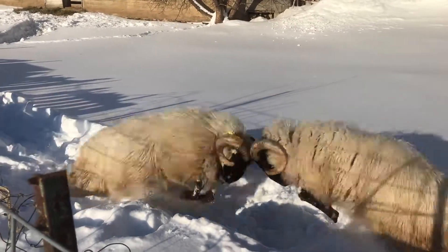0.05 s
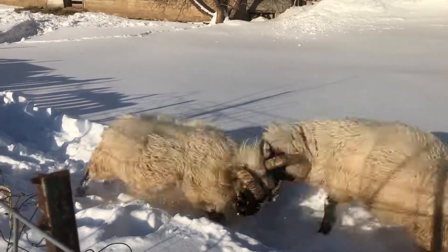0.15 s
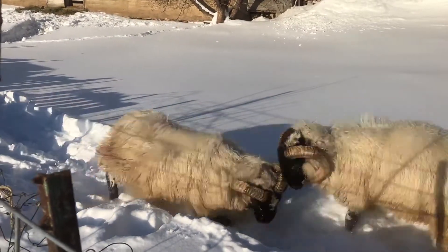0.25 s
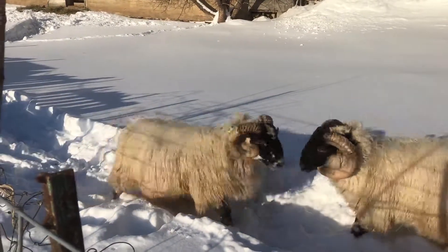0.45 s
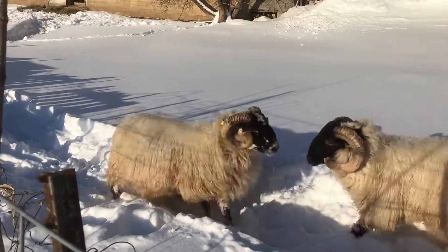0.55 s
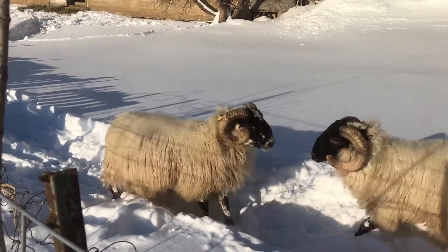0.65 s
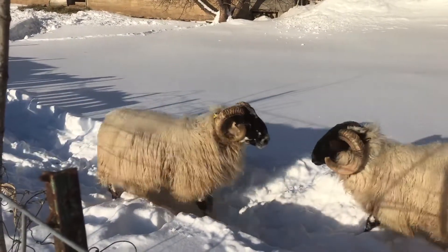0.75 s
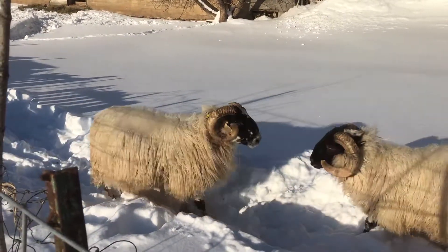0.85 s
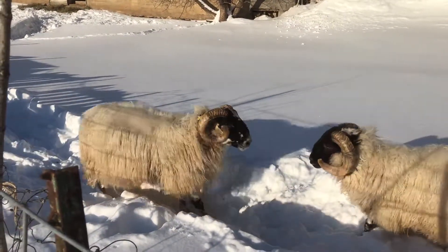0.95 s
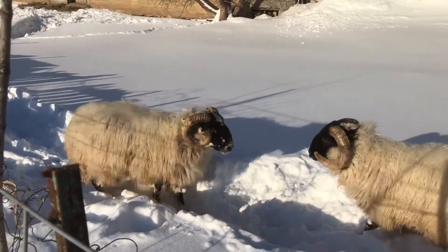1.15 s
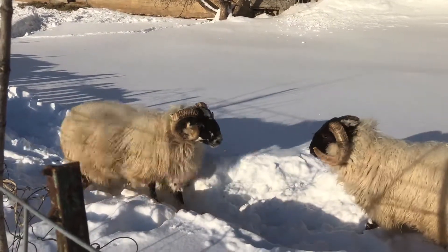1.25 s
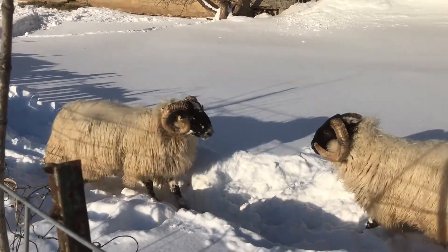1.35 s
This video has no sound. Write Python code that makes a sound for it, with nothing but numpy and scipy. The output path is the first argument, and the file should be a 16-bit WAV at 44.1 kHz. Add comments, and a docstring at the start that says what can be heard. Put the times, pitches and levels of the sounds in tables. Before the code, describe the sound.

Two rams butt heads once at about 0.2 seconds, just after a faint scuff of hooves in snow. The horns crack sharply, with a hard knock and a low, shuddering thud, and a short yard echo fades within half a second. From 0.3 to about 1.3 seconds, much quieter hooves pack, crunch and creak in the snow, with tiny crisp snaps and ticks over faint outdoor air.

```python
"""A hoof scuffs softly through snow, then two rams butt heads once in a farm yard. The horns crack, the skulls
knock and the bodies thud as the blow spreads through them. Fence and sheds throw it back, the low end returning
a little later. The rams back off, hooves packing and creaking in the snow, with snapping crusts and ticking
crumbs over faint outdoor air."""
import sys
import numpy as np
from scipy import signal
from scipy.fft import rfft, irfft, next_fast_len
from scipy.io import wavfile
from scipy.ndimage import uniform_filter1d

SR = 44100
rng = np.random.default_rng(int(sys.argv[2]) if len(sys.argv) > 2 else 0)


def int16_out(signal):
    """Quantize to a 16-bit WAV file."""
    q = np.round(np.clip(np.atleast_2d(signal).T, -1, 1) * 32767)
    wavfile.write(sys.argv[1], SR, q.astype(np.int16))


N = 61739

BUTT_S, BUTT_GAIN_DB = 0.2201, 1.5
LAG_CYCLES = 1.6  # each frequency arrives this many of its own cycles late
# The ring of horns, skulls and bodies: pitch_hz, width_hz, relative_db
RAM_MODES = [(69.5, 31, 32), (158, 85, 24), (276, 80, 21), (395, 70, 21.5), (450, 63, 26.5),
             (534.6, 42, 23.5), (697.5, 160, 25), (889, 94, 23), (1112, 166, 21.5), (1330, 395, 18),
             (2162, 466, 17.5), (2876, 360, 7), (3570, 1100, 6), (7200, 2680, 8)]
def blow():
    """Spectrum of the hit spreading from horn to body: crack first, knock and deep thud behind it."""
    gain = np.sqrt(sum((amp(db) * bump(hz, width)) ** 2 for hz, width, db in RAM_MODES))
    phase_cycles = LAG_CYCLES * np.log(bins() / 1000) + 0.73
    return amp(BUTT_GAIN_DB) * causal(gain) * np.exp(-2j * np.pi * phase_cycles)


SOFTEN_ABOVE_HZ = 11400
# Ticks of ridged horn slipping and catching: start_s, level_db, pitch_hz
HORN_CATCHES = [(0.2209, -11.5, 2612), (0.2228, -4.5, 6000)]
def horns(hit):
    """The hit and the catches right after it; horn yields a little, which softens the crack."""
    give = 1 / np.sqrt(1 + (bins() / SOFTEN_ABOVE_HZ) ** 4)
    ticks = sum(play(amp(db) * causal(give * bump(hz, hz)), s) for s, db, hz in HORN_CATCHES)
    return play(hit * give, BUTT_S) + ticks


# Low echoes of the hit off the yard: delay_s, level_db
LOW_ECHOES = [(.047, -14.5), (0.084, -26)]
def low_echoes(thud):
    """The yard throws back the low part of the hit, later and fainter."""
    return sum(amp(db) * play(thud, BUTT_S + delay) for delay, db in LOW_ECHOES)


# Slapback off fence and sheds: start_s, level_db, cutoff_hz, smear_s
SLAPBACKS = [(0.2465, -24.5, 1500, 0.0038), (0.2542, -22, 6100, 0.00061), (0.2664, -27, 3000, 0.0013),
             (0.297, -28, 2500, 0.015)]
def echoes(hit, highs):
    """The upper part of the hit bounces back, dulled and smeared."""
    out = np.zeros(N)
    for s, db, cutoff_hz, smear_s in SLAPBACKS:
        scatter = rng.choice([-1., 1.], N) * np.exp(-since(0) / smear_s)
        colour = causal(highs / np.sqrt(1 + (bins() / cutoff_hz) ** 2))
        out += amp(db) * play(hit * colour * spectrum_of(scatter / np.linalg.norm(scatter)), s)
    return out


GROUND_DB, GROUND_T60_S = -23.5, 0.081
# Tone of the splash off the ground: frequency_hz, relative_db
GROUND_EQ = [(60, -4.5), (200, -0.5), (500, 6), (1000, -3.5), (2000, -5.5), (4000, -19.5), (7500, -25),
             (11000, -32.5), (16000, -23.5)]
def ground_scatter():
    """The ground nearby scatters the hit into a quick burst of noise."""
    t = since(BUTT_S)
    return amp(GROUND_DB - 60 * t / GROUND_T60_S) * (t > 0) * noise(eq(GROUND_EQ))


TAIL_DB, TAIL_RISE_S = -36, 0.03
# Tone of the yard's reverb: frequency_hz, relative_db
TAIL_EQ = [(30, -17.5), (65, 16.5), (130, 4.5), (400, 4), (1000, -7.5), (2000, -14.5), (4000, -15),
           (8000, -22), (12000, -26), (16000, -27.5)]
# Time the reverb takes to fall 60 dB: frequency_hz, decay_s
TAIL_DECAY = [(60, .45), (400, 0.39), (1500, 0.64), (5000, 0.57), (14000, 0.7)]
def yard_tail():
    """Faint reverb blooms after the hit, each band dying at its own rate."""
    hz, frame_s, bands = signal.stft(noise(eq(TAIL_EQ)), SR, nperseg=512)
    decay = amp(-60 * np.maximum(frame_s - BUTT_S, 0) / curve_at(TAIL_DECAY, hz)[:, None])
    tail = signal.istft(bands * decay, SR, nperseg=512)[1][:N]
    return amp(TAIL_DB) * (1 - np.exp(-since(BUTT_S) / TAIL_RISE_S)) * tail


# Hooves pressing into snow: start_s, length_s, level_db, pitch_hz
HOOF_STEPS = [(0.0, 0.034, -54.5, 190), (0.108, 0.069, -55.5, 75.5), (0.144, 0.0046, -50, 1110),
              (0.16, 0.024, -53.5, 1200), (0.164, 0.036, -53, 298), (0.308, 0.028, -49, 540),
              (0.377, 0.036, -51.5, 126), (0.377, 0.014, -55, 970), (0.475, 0.082, -60.5, 73.5),
              (0.496, 0.017, -51.5, 270), (0.519, 0.0075, -48.5, 271), (0.558, 0.013, -55, 527),
              (0.598, 0.15, -67.5, 453), (0.644, 0.006, -53.5, 886), (0.677, 0.01, -60.5, 1120),
              (1.236, 0.024, -57.5, 188.4)]
def steps():
    """Each hoof packs the snow with a short dull push."""
    out = np.zeros(N)
    for s, length, db, hz in HOOF_STEPS:
        age = 3 * since(s) / length  # the push peaks a third of the way in
        shape = age * np.exp(1 - age)
        push = shape * noise(bump(hz, width=0.98 * hz))
        out += amp(db) * push * np.linalg.norm(shape) / np.linalg.norm(push)
    return out


GRAINS_PER_S, GRAIN_SPREAD_DB, TILT_PIVOT_HZ = 9000, 2, 3500
CREAK_HZ, CREAK_WIDTH_HZ, CREAK_SAG_HZ_PER_S = 4140, 1000, 11000
# Tone of breaking snow, loose or crusted: frequency_hz, relative_db
SNOW_EQ = [(100, 4.5), (500, 2), (1500, 5), (2800, -0.5), (4200, -0.5), (8000, -3.5), (12000, -10),
           (16000, -10.5)]
# Hoof strokes through loose snow: start_s, length_s, level_db, tilt_db_per_octave, creak_amount
HOOF_SCUFFS = [(0.0, 0.062, -60.5, 5.5, 0.33), (0.065, 0.035, -57, 4, 0.15), (0.138, 0.023, -53, 6.5, 0),
               (0.267, 0.019, -48, 3.5, 0.67), (0.375, 0.099, -63, 2, 0.42), (0.645, 0.14, -65, 0, 0.11),
               (0.714, 0.11, -62.5, 4, 0.28), (0.833, 0.042, -59, -1, 0.6), (0.847, 0.096, -64, 0, .9),
               (0.921, 0.1, -61.5, 2, 0.7), (0.968, 0.14, -62, -4, 0.19), (1.081, 0.057, -66, 4.5, .1),
               (1.124, 0.078, -64.5, 4.5, 0.34), (1.229, 0.031, -62.5, 0, 0),
               (1.255, 0.065, -65.5, 1, 0.38), (1.304, 0.044, -71, -1, 0.3)]
def scuffs():
    """Crystals snap densely under each stroke, and packed snow creaks in a sinking band."""
    out, snow = np.zeros(N), eq(SNOW_EQ)
    octaves = np.log2(np.maximum(bins(), 200) / TILT_PIVOT_HZ)
    for s, length, db, tilt_db, creak_amount in HOOF_SCUFFS:
        grains = (rng.random(N) < GRAINS_PER_S / SR) * rng.choice([-1, 1], N)
        sizes = amp(GRAIN_SPREAD_DB * np.minimum(rng.exponential(1, N), 4))
        crunch = play(spectrum_of(grains * sizes) * snow * amp(tilt_db * octaves))
        t = np.minimum(since(s), length)
        creak = resonate(crunch, CREAK_HZ - CREAK_SAG_HZ_PER_S * t, CREAK_WIDTH_HZ)
        swell = np.sin(np.pi * t / length)
        out += amp(db) * swell * unit_rms(crunch + 2 * creak_amount * creak)
    return out


# Single crusts of snow snapping: start_s, level_db
CRUST_SNAPS = [(0.148, -52.5), (0.207, -69), (0.378, -53), (0.645, -56.5), (1.238, -55.5), (1.252, -54.5)]
def snaps():
    """The crust gives way with a brief crisp burst."""
    return bursts(CRUST_SNAPS, decay_s=0.003) * noise(eq(SNOW_EQ))


CRUMB_HZ = 11610
# Loose crumbs of snow landing: start_s, level_db
CRUMB_TICKS = [(0.429, -55.5), (0.476, -65), (0.574, -76), (0.883, -63), (0.897, -60), (1.173, -63.5),
               (1.192, -60), (1.288, -62)]
def crumbs():
    """Falling crumbs land with thin high ticks."""
    return bursts(CRUMB_TICKS, decay_s=0.0025) * noise(bump(CRUMB_HZ, width=CRUMB_HZ / 2))


AIR_PATCH_DB = 3
# Tone of the outdoor bed: frequency_hz, relative_db
AIR_EQ = [(20, -15), (40, -8), (65, 2.5), (140, -2), (300, -2), (700, -7), (1500, -13), (3000, -18),
          (8000, -22.5), (16000, -25.5)]
# Fader ride on the bed: time_s, level_db
AIR_FADER = [(0, -62), (0.301, -58), (0.58, -65), (0.8, -66), (0.969, -61.5), (1.119, -63), (1.211, -65),
             (1.28, -65.5), (1.4, -61.5)]
def air():
    """Faint outdoor noise whose bands flicker in small patches."""
    bands = signal.stft(noise(eq(AIR_EQ)), nperseg=1024)[2]
    flicker = uniform_filter1d(rng.standard_normal(bands.shape), size=12, axis=0)  # across frequency
    patches = unit_rms(uniform_filter1d(flicker, size=5, axis=1))  # across time
    wash = signal.istft(bands * amp(AIR_PATCH_DB * patches), nperseg=1024)[1][:N]
    return unit_rms(wash) * amp(np.interp(since(0), *np.transpose(AIR_FADER)))


def amp(db):
    """Decibels to gain."""
    return 10 ** (np.asarray(db) / 20)


def unit_rms(x):
    """Scales to rms 1."""
    return x / np.sqrt(np.mean(x ** 2) + 1e-20)


def since(s):
    """Seconds since s, zero before."""
    return np.maximum(np.arange(N) / SR - s, 0)


def bursts(events, decay_s):
    """An envelope that jumps at each event and dies away."""
    return sum(amp(db) * (since(s) > 0) * np.exp(-since(s) / decay_s) for s, db in events)


def bins():
    """Frequencies in Hz of a spectrum twice as long as the scene."""
    return np.fft.rfftfreq(2 * next_fast_len(N), 1 / SR) + 1e-3


def curve_at(points, hz):
    """Reads a table on a log-frequency axis."""
    f, value = np.transpose(points)
    return np.interp(np.log(hz + 1), np.log(f + 1), value)


def eq(points):
    """A tone table as gain on every bin."""
    return amp(curve_at(points, bins()))


def bump(hz, width):
    """Gain of a steep-sided resonance."""
    return 1 / (1 + (2 * (bins() - hz) / width) ** 2)


def causal(gain):
    """The spectrum with this gain and the tightest attack (minimum phase)."""
    log = np.log(np.maximum(gain, 1e-5))
    mirrored = np.r_[log, log[-2:0:-1]]
    return np.exp(np.conj(signal.hilbert(mirrored)))[:len(gain)]


def spectrum_of(x):
    """The spectrum of a sound on those bins."""
    return rfft(x, 2 * next_fast_len(N))


def play(spectrum, s=0):
    """Turns a spectrum into sound that starts at time s."""
    return irfft(spectrum * np.exp(-2j * np.pi * bins() * s))[:N]


def noise(gain):
    """Noise of rms 1 with the given colour."""
    return unit_rms(play(spectrum_of(rng.standard_normal(N)) * gain))


def resonate(x, hz, width):
    """A resonance of gain 1 that follows the curve hz."""
    turn = np.exp(2j * np.pi * np.cumsum(hz) / SR)
    pole = np.exp(-np.pi * width / SR)
    return 2 * (turn * signal.lfilter([1 - pole], [1, -pole], x / turn)).real


CROSSOVER_HZ = 354  # the hit's low part echoes late below this, and slaps back above it
def scene():
    """Mixes the collision, the yard's answer, the footwork and the air in mono."""
    hit = blow()
    lows = 1 / (1 + (bins() / CROSSOVER_HZ) ** 4)
    collision = horns(hit) + low_echoes(hit * lows)
    yard = echoes(hit, highs=1 - lows) + ground_scatter() + yard_tail()
    footwork = steps() + scuffs() + snaps() + crumbs()
    return (collision + yard + footwork + air())[None]


LOW_CUT_HZ, HIGH_CUT_HZ = 30, 16100
def record(dry):
    """Trims the sub-bass and the very top of the mix."""
    low_cut = signal.butter(3, LOW_CUT_HZ, "high", fs=SR, output="sos")
    high_cut = signal.firwin(255, HIGH_CUT_HZ, window=("kaiser", 9), fs=SR)
    return signal.oaconvolve(signal.sosfilt(low_cut, dry), high_cut[None], "same")


dry = scene()
out = record(dry)
int16_out(out)
```